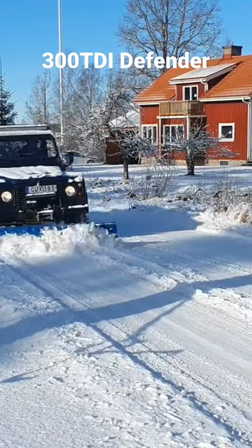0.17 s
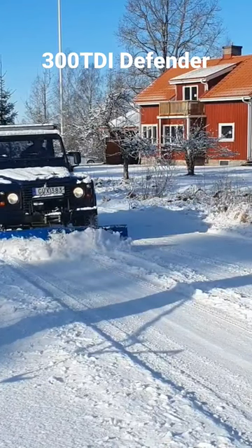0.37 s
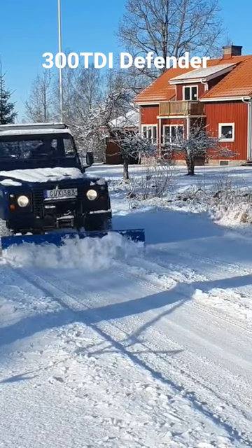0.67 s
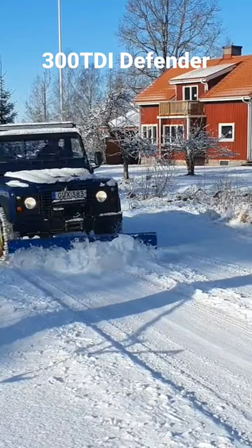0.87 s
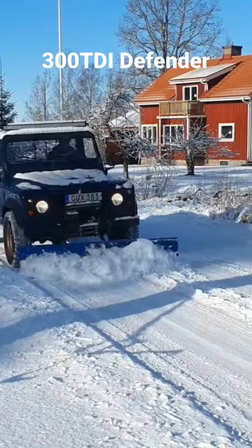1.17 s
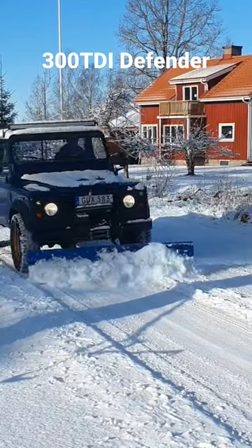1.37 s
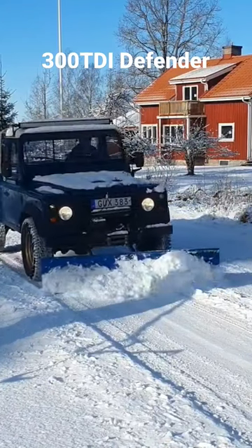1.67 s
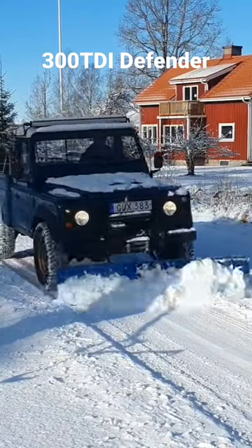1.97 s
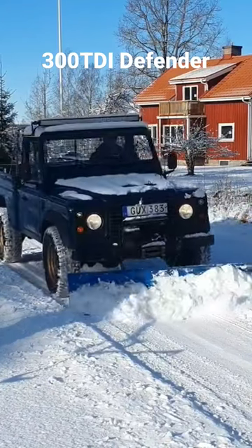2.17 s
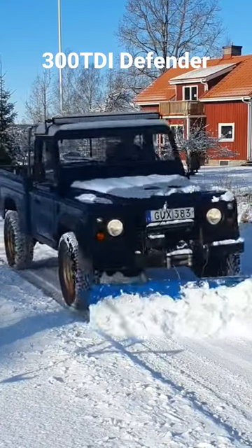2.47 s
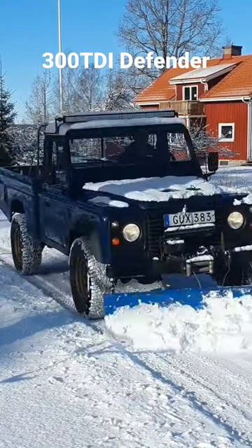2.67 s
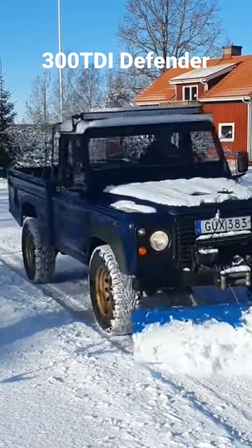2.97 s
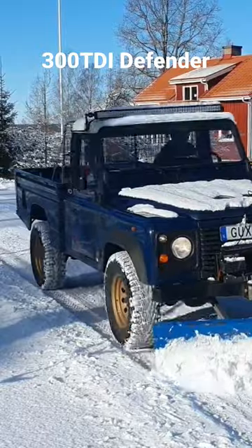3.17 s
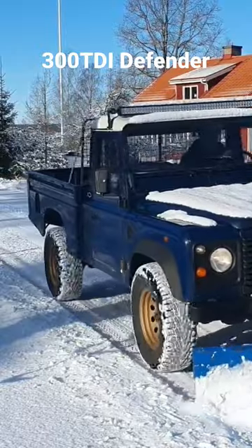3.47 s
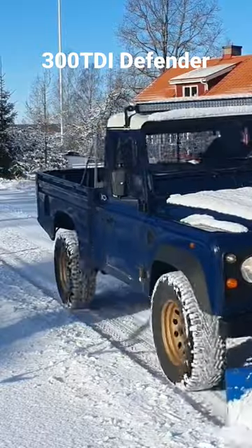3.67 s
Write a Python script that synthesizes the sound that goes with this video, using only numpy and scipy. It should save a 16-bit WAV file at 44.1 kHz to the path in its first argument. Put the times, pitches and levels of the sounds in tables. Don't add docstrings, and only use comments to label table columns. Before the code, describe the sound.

A diesel pickup clatters closer, its plough blade scraping and rattling through snow on frozen ground.

```python
import sys
import numpy as np
from scipy import signal
from scipy.fft import rfft, irfft, next_fast_len
from scipy.io import wavfile
from scipy.ndimage import uniform_filter1d, map_coordinates

SR = 44100
rng = np.random.default_rng(int(sys.argv[2]) if len(sys.argv) > 2 else 0)


def volts(x):
    e = np.asarray(x, float) / 20
    return 10 ** e


def put_to_file(sound):
    columns = np.atleast_2d(sound).T
    safe = np.clip(columns, -1, 1)
    whole_steps = np.round(safe * 32767)
    wavfile.write(sys.argv[1], SR, whole_steps.astype(np.int16))


N = 168462
TIME = np.arange(N) / SR


def unit(x):
    return x / np.sqrt(np.mean(x ** 2) + 1e-20)


def along(points, hz):
    f, v = np.transpose(points)
    return np.interp(np.log(hz + 1), np.log(f + 1), v)


def over_time(points, t=TIME):
    return np.interp(t, *np.transpose(points))


def wobble(rate_hz):
    return map_coordinates(rng.standard_normal(400), [np.clip(TIME * rate_hz, 0, 399)])


def filtered(x, response):
    n = x.shape[-1]
    m = next_fast_len(n + 4096)
    return irfft(rfft(x, m) * response(np.fft.rfftfreq(m, 1 / SR)), m)[..., :n]


def peak(f, hz, width_hz):
    return 1j * f * width_hz / (hz * hz - f * f + 1j * f * width_hz)


def rush(spectrum, patchy_db):
    z = signal.stft(rng.standard_normal(N), nperseg=512)[2]
    field = uniform_filter1d(rng.standard_normal(z.shape), size=5, axis=0)
    field = uniform_filter1d(field, size=8, axis=1)
    noise = signal.istft(z * volts(patchy_db * unit(field)), nperseg=512)[1][:N]
    return unit(filtered(noise, lambda hz: volts(along(spectrum, hz))))


def place(out, start_s, sound):
    out[max(round(start_s * SR), 0):][:len(sound)] += sound


# time in seconds, engine level in dB, left over right in dB.
APPROACH = [
    (0, -40, 26.5),
    (1.5, -39, 22),
    (2.2, -36.5, 20.5),
    (2.9, -34, 15.5),
    (3.4, -32.5, 13.5),
    (3.82, -32, 10),
]


def approach(column, t=TIME):
    return np.interp(t, np.array(APPROACH)[:, 0], np.array(APPROACH)[:, column])


# frequency in Hz, density in dB per Hz.
RUMBLE_SPECTRUM = [(20, -22.5), (86, 2), (200, -17), (300, -12.5), (390, -21.5), (660, -120)]
# time in seconds, level in dB.
RUTS = [
    (0, -1),
    (1.25, -8),
    (1.5, -8.5),
    (3.1, -5),
    (3.5, -2.5),
]


def rumble():
    level_db = -34 + over_time(RUTS) + wobble(5.64)
    return volts(level_db) * rush(RUMBLE_SPECTRUM, patchy_db=0.5)


# frequency in Hz, density in dB per Hz.
FIZZ_SPECTRUM = [(7600, -63), (8600, -11.5), (10000, -8), (12500, -3.5), (15300, -5.5), (15900, -90)]


def fizz():
    level_db = -28.5 - 0.2 * (approach(1) + 36) + 1.2 * wobble(8.3)
    return volts(level_db) * rush(FIZZ_SPECTRUM, patchy_db=2)


# frequency in Hz, density in dB per Hz.
SCRAPE_SPECTRUM = [(88, -37), (150, -18.5), (424, -7.5), (622, -6.5), (1700, -14), (4410, -20.5),
                   (8200, -40), (10700, -78), (18000, -120)]


def scrape():
    level_db = -3.5 + 0.17 * wobble(13) + 0.24 * wobble(35)
    return volts(level_db) * rush(SCRAPE_SPECTRUM, patchy_db=2)


def snow():
    return volts(approach(1)) * (scrape() + fizz()) + rumble()


# start in seconds, peak in dB, pitch in Hz, t60 in seconds.
THUMPS = [(.005, -26.5, 133, 0.092), (0.214, -30.5, 123, 0.18), (0.342, -33, 648, 0.26),
          (.38, -23, 230, 0.12), (.467, -25, 294, 0.15), (.491, -24.5, 644, 0.13), (0.491, -26, 164, 0.3),
          (.51, -25.5, 393, 0.1), (0.525, -28, 197, 0.25), (0.656, -33.5, 287, 0.2), (0.754, -26, 403, 0.1),
          (0.769, -27, 258, 0.12), (.942, -26, 252, 0.19), (1.055, -32.5, 234.6, 0.28),
          (1.146, -23.5, 157, 0.15), (1.263, -18, 233, 0.15), (1.296, -22, 167, 0.12),
          (1.426, -20.5, 286, 0.17), (1.456, -18.5, 236.6, 0.13), (2.113, -25.5, 272, 0.1),
          (2.447, -24.5, 378, 0.17), (2.796, -19, 225.5, 0.2), (2.981, -23.5, 240, 0.18),
          (3.068, -31, 256, 0.18), (3.234, -23, 131.7, 0.17), (3.381, -17.5, 234.4, 0.26),
          (3.408, -21, 100, 0.24), (3.477, -25, 225, 0.22), (3.571, -25, 378, 0.28),
          (3.586, -25.5, 194, 0.16), (3.703, -22, 248, 0.54), (3.729, -13, 221, 0.1)]
# pitch ratio, level in dB, t60 ratio.
FRAME_MODES = [(0.676, -8.5, 0.89), (1, 1, 0.48), (1.248, -13, 1), (1.698, -11, 0.97)]


def thumps():
    out, t = np.zeros(N + SR), TIME[:14000]
    rise_s = 0.0018
    for start_s, db, hz, t60_s in THUMPS:
        ring = 0
        for (ratio, mode_db, t60_ratio), (a, b) in zip(FRAME_MODES, rng.standard_normal((len(FRAME_MODES), 2))):
            detune = 1 + 0.053 * b * (ratio != 1)
            decay = volts(mode_db + 0.49 * a - 60 * t / (t60_s * t60_ratio))
            ring = ring + decay * np.sin(2 * np.pi * hz * ratio * detune * t)
        place(out, start_s - 0.003, volts(db + 2.5) * ring * (1 - np.exp(-t / rise_s)))
    return out[:N]


# start in seconds, peak in dB, ringing in Hz.
PINGS = [(0.2147, -27, 1350), (.2808, -22.5, 2224), (.356, -22, 2205), (.361, -25.5, 2100),
         (.377, -25, 2710), (.468, -43, 2800), (0.517, -21.5, 2800), (0.657, -25.5, 2740),
         (0.665, -25, 2020), (.673, -26, 2020), (0.7639, -26.5, 1830), (.9368, -28, 2410),
         (.9567, -19.5, 2100), (1.136, -22, 2900), (1.141, -42, 13600), (1.14, -19, 2750),
         (1.2522, -28, 2480), (1.4146, -22, 1840), (1.4155, -27.5, 4080), (1.4187, -21.5, 2510),
         (1.42, -27.5, 4100), (1.456, -31, 4200), (2.4365, -29, 2250), (2.5037, -21, 2900),
         (2.7882, -19, 3250), (2.789, -20.5, 1255), (2.795, -19, 6400), (2.797, -25, 3200),
         (2.8, -21, 6300), (2.804, -25, 1233), (2.806, -16, 2700), (2.817, -20, 2770), (2.821, -24, 2700),
         (3.38, -19, 1270), (3.381, -20, 5770), (3.3805, -23, 4480), (3.3825, -36, 1360),
         (3.481, -18, 1300), (3.487, -24, 2900), (3.487, -26, 1230), (3.5728, -15.5, 2500),
         (3.576, -13.5, 2980), (3.58, -16.5, 5730), (3.588, -35, 2900), (3.7032, -22, 1860),
         (3.723, -12, 2900), (3.727, -23, 2920), (3.728, -12.5, 5370), (3.7265, -38, 12000),
         (3.73, -15.5, 2900)]


def pings():
    out, ticks, t = np.zeros(N + SR), np.zeros(N + SR), TIME[:3000]
    cycles_t60, rise_s = 55, 0.0009
    partner_ratio, partner_db = 1.13, -5
    tick_db, tick_t60_s, tick_low_hz = -25, 0.0049, 9000
    for start_s, db, hz in PINGS:
        shape = volts(-60 * t * hz / cycles_t60) * (1 - np.exp(-t / rise_s))
        partner = volts(partner_db) * np.sin(2 * np.pi * hz * partner_ratio * t)
        place(out, start_s, volts(db + 1.5) * shape * (np.sin(2 * np.pi * hz * t) + partner))
        place(ticks, start_s, volts(db + tick_db - 60 * t / tick_t60_s) * rng.standard_normal(len(t)))
    return out[:N] + filtered(ticks[:N], lambda f: f > tick_low_hz)


# start in seconds, peak in dB, centre in Hz, length in seconds.
RATTLES = [(.002, -25, 2500, 0.012), (0.089, -29.5, 2860, 0.0097), (0.211, -27.5, 2700, 0.0091),
           (0.275, -24, 2300, 0.0043), (0.339, -27, 2250, 0.029), (0.354, -27, 2180, 0.011),
           (0.372, -21, 2580, 0.01), (0.461, -26.5, 2780, 0.016), (.517, -28.5, 2780, 0.0067),
           (0.649, -26, 2480, 0.036), (0.759, -26.5, 2700, 0.012), (0.861, -31.5, 2800, 0.025),
           (0.898, -28, 2900, 0.0089), (0.928, -24.5, 2130, 0.0076), (0.949, -24.5, 2100, 0.011),
           (1.136, -20.5, 2770, 0.0105), (1.256, -23, 2550, 0.0036), (1.416, -25, 2300, 0.008),
           (1.439, -30.5, 2900, 0.027), (2.434, -17.5, 2180, 0.0078), (2.497, -21, 2900, 0.015),
           (2.784, -13, 3100, 0.019), (2.967, -20.5, 1350, 0.012), (3.059, -22.5, 3300, .014),
           (3.218, -21.5, 3400, 0.01), (3.375, -15, 1260, 0.012), (3.473, -15, 2900, 0.018),
           (3.567, -17, 2780, 0.011), (3.701, -12, 1980, 0.0038), (3.718, -10.5, 2900, 0.015)]
# frequency in Hz, density in dB per Hz.
CLASH = [(300, -12), (900, 4.5), (2300, 0), (3200, -3), (4000, -6.5), (6600, -13), (8400, -29),
         (12200, -22.5), (15300, -33), (15800, -90)]
BLADE_HZ = [1328, 1792, 2100, 2300, 2700, 2900, 3190, 4370, 5720, 6680]


def rattles():
    out, t = np.zeros(N + SR), TIME[:6000]
    rise_s, tail_t60_s, chatter_db = 0.0048, 0.04, 4
    broad, focus_db, focus_q = 0.45, -1, 16
    ring_db, mode_width_hz, away_db_per_octave = -5, 58, 1
    for start_s, db, hz, length_s in RATTLES:
        shape = (1 - np.exp(-t / rise_s)) ** 2 * volts(-60 * (t - length_s).clip(0) / tail_t60_s)
        impacts = np.repeat(rng.standard_normal(75).clip(-2, 1.5), 80)
        octaves = np.abs(np.log2(np.array(BLADE_HZ) / hz))
        gains = volts(rng.normal(0, 5.9, len(BLADE_HZ)) - away_db_per_octave * octaves)

        def colour(f):
            ring = sum(g * peak(f, mode_hz, mode_width_hz) for g, mode_hz in zip(gains, BLADE_HZ))
            focus = volts(focus_db) * peak(f, hz, hz / focus_q)
            return volts(along(CLASH, f)) * (broad + focus + volts(ring_db) * ring)

        burst = filtered(shape * volts(chatter_db * impacts) * rng.standard_normal(len(t)), colour)
        rms = np.sqrt(np.mean(burst[:round((length_s + rise_s) * SR)] ** 2))
        place(out, start_s - rise_s / 2, volts(db) * 0.27 * burst / rms)
    return out[:N]


# time in seconds, firing rate in Hz.
FIRING_HZ = [(0, 49), (1.2, 48.1), (2, 47.9), (3.82, 47.9)]
CYLINDER_DB = [5, 4.5, 4, 2]


def firings(turns):
    jitter_gaps, scatter_db = 0.012, 1.5
    count = np.arange(1, 240)
    draw = rng.standard_normal((len(count), 2))
    at = np.interp(count + jitter_gaps * draw[:, 0], turns, np.arange(N), right=N).astype(int)
    size = volts(np.array(CYLINDER_DB)[count % 4] + scatter_db * draw[:, 1])
    return np.bincount(at, size, N + 1)[:N]


# frequency in Hz, width in Hz, level in dB far, midway, near.
BLOCK_MODES = [(485, 90, -11.5, -20, 0.5), (609.8, 35, 3.5, 2.5, 2), (963.6, 41, 2.5, 1, -6),
               (1216, 26.4, 2.5, 2, 2.5), (1350, 25, 2.5, 4, -1), (1452, 42, -6.5, -3, -3),
               (1535, 28, -15, -9, 1.5), (1709, 61, -3, 3, -1), (1885, 61, -32, -11, -1.5),
               (2926, 247, -10, -6, -6.5), (4215, 98, -13, -8.5, -7), (5610, 190, -18.5, -19, -10),
               (6760, 250, -15, -23, -8.5)]
FACING_S = [.8, 2.2, 3.2]


def through_block(x):
    def response(f):
        views = []
        for view in (2, 3, 4):
            modes = [(-1) ** k * volts(row[view]) * peak(f, *row[:2]) for k, row in enumerate(BLOCK_MODES)]
            views.append(sum(modes))
        return np.array(views) * (1 - f / 9000).clip(0)

    facing = np.array([np.interp(TIME, FACING_S, share) for share in np.eye(3)])
    return unit((facing * filtered(x, response)).sum(0))


# multiple of the firing rate, level in dB, flutter in dB.
BOOM = [(1, -27.5, -4), (1.68, -9.5, 6), (2, -8, 5), (13, -8, 3.5)]


def exhaust(turns):
    out = 0
    for order, db, flutter_db in BOOM:
        level = volts(db + flutter_db * wobble(14))
        out = out + level * np.sin(2 * np.pi * order * turns + 0.5 * wobble(5.6))
    return out


def engine():
    bang_db, knock_db = -5.5, -3
    knock_decay_s, knock_rise_s = 0.011, 0.0022
    boom_share = 0.36
    turns = np.cumsum(over_time(FIRING_HZ)) / SR
    bangs = firings(turns)
    t = TIME[:4000]
    gate = signal.fftconvolve(bangs, np.exp(-t / knock_decay_s) - np.exp(-t / knock_rise_s))[:N]
    bang = through_block(bangs)
    knock = through_block(gate * rng.standard_normal(N))
    level_db = approach(1)
    block = volts(level_db) * (volts(bang_db) * bang + volts(knock_db) * knock)
    return block + volts(-36 + boom_share * (level_db + 36)) * exhaust(turns)


# frequency in Hz, share of the side lean.
SHADE = [(300, -0.063), (700, 0.21), (1300, 0.53), (2400, 0.64), (5500, 1), (9000, 0.15)]
# time in seconds, treble phase in radians.
LEAD_RAD = [(0, .8), (1.5, .1), (3.82, -1.5)]
# frequency in Hz, share of the lead.
LEAD_SHARE = [(100, 0.081), (800, 0.24), (6000, 1.15)]


def ports(x):
    hz, t, z = signal.stft(x, SR, nperseg=1024)
    lean_db = np.outer(along(SHADE, hz), approach(2, t)) / 2
    lead = np.outer(along(LEAD_SHARE, hz), over_time(LEAD_RAD, t)) / 2
    pair = [z * volts(side * lean_db) * np.exp(side * 1j * lead) for side in (1, -1)]
    return signal.istft(np.array(pair), SR, nperseg=1024)[1][:, :N]


# frequency in Hz, t60 in seconds.
YARD_T60 = [(100, 0.14), (3000, 0.11)]
# frequency in Hz, level in dB.
YARD_DB = [(200, -15), (2000, -5), (12000, -4)]


def yard(x):
    hz, t, z = signal.stft(rng.standard_normal((2, SR // 3)), SR, nperseg=256)
    tail = signal.istft(z * volts(-60 * t / along(YARD_T60, hz)[:, None]), SR, nperseg=256)[1]
    wet = signal.fftconvolve(x[None], tail / np.linalg.norm(tail[0]), axes=1)[:, :N]
    return filtered(wet, lambda f: volts(along(YARD_DB, f)))


# frequency in Hz, level in dB.
SPREAD_DB = [(35, 2), (90, -17), (300, -7), (1200, -2.5), (5000, -5), (9000, 2.5)]


def scene():
    truck = engine() + snow() + rattles() + pings() + thumps()
    wide = filtered(np.array([snow(), snow()]), lambda f: volts(along(SPREAD_DB, f)))
    return volts(-1) * ports(truck) + yard(truck) + wide


# frequency in Hz, share of moments that fall silent.
MUTED = [(7200, 0), (7800, .35), (8600, .75), (10000, .55), (13400, .33), (14600, .55), (15400, .95)]


def mute_treble(x):
    top_hz, lead_in = 15790, 136
    hz, t, z = signal.stft(np.pad(x, ((0, 0), (lead_in, 0))), SR, "cosine", 2048)
    band_hz = hz[4::8, None]
    power = (np.abs(z[:, :1024]) ** 2).sum(0).reshape(128, 8, -1).sum(1)
    chance = uniform_filter1d(rng.standard_normal(power.shape), size=2, axis=1)
    chance = unit(uniform_filter1d(chance, size=2, axis=0))
    loudness = np.log(power + 1e-20) + 1.1 * chance
    rank = loudness.argsort(1).argsort(1) / len(t)
    keep = (rank >= along(MUTED, band_hz)) & (band_hz < top_hz)
    keep = np.pad(np.repeat(keep, 8, 0), ((0, 1), (0, 0)))
    return signal.istft(z * keep, SR, "cosine", 2048)[1][:, lead_in:lead_in + N]


def roll_off(x):
    return signal.sosfilt(signal.butter(12, 15710, fs=SR, output="sos"), x)


def record(dry):
    return roll_off(mute_treble(dry))


dry = scene()
out = record(dry)
put_to_file(out)
```